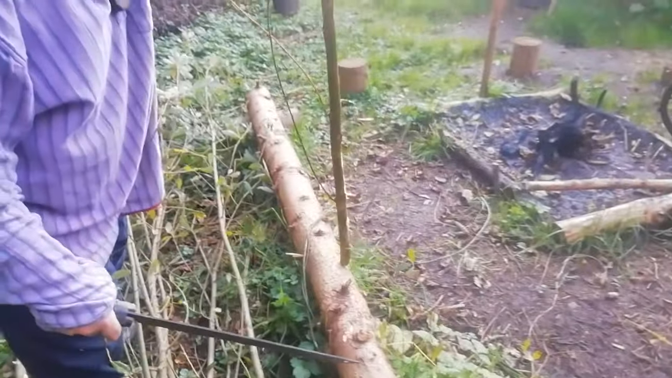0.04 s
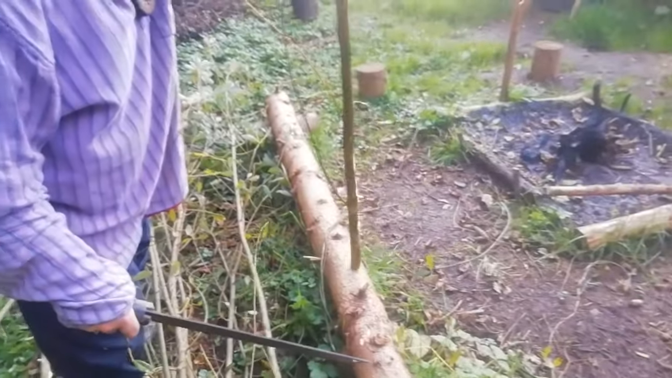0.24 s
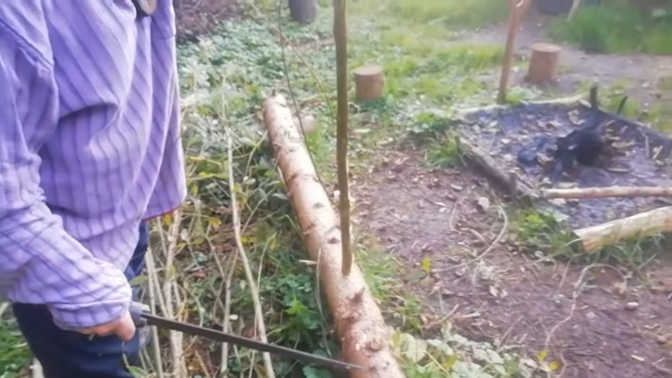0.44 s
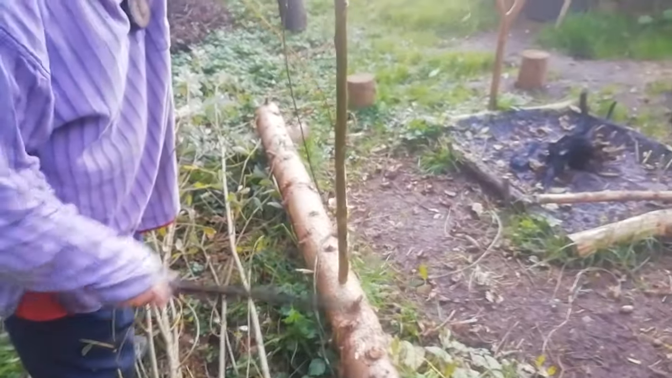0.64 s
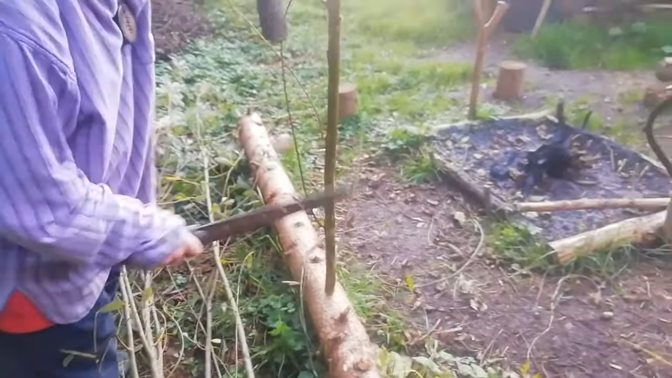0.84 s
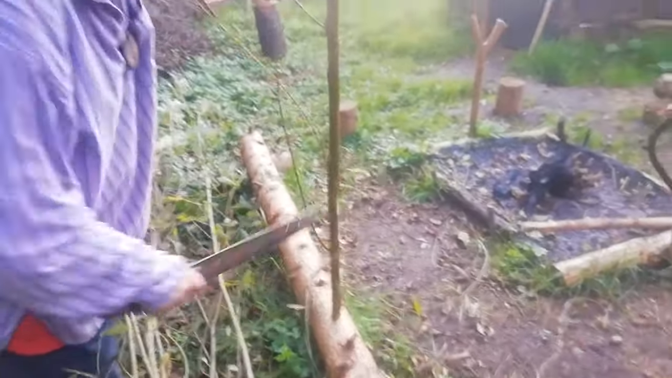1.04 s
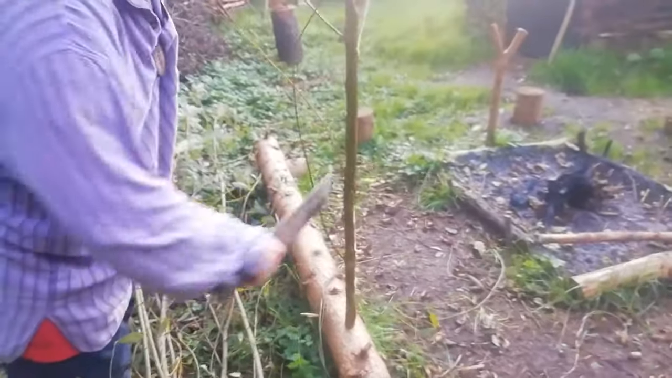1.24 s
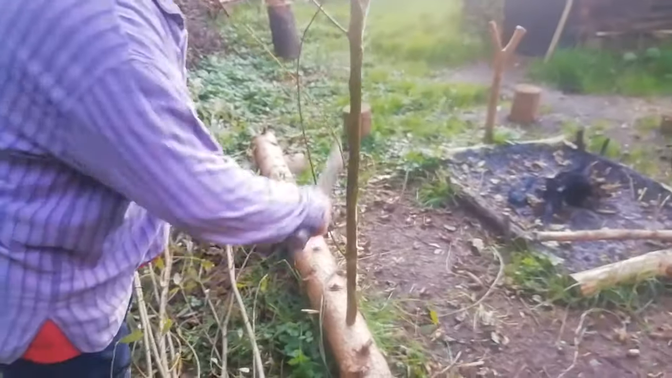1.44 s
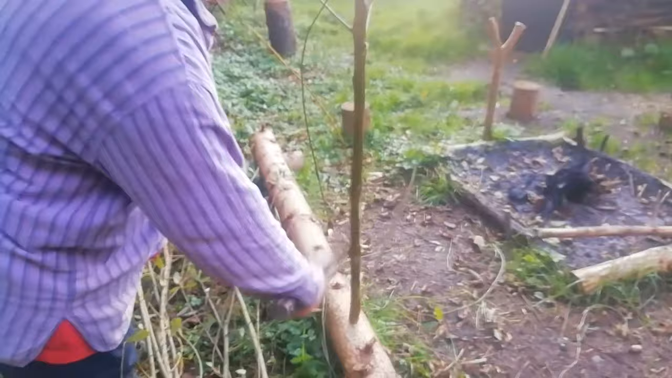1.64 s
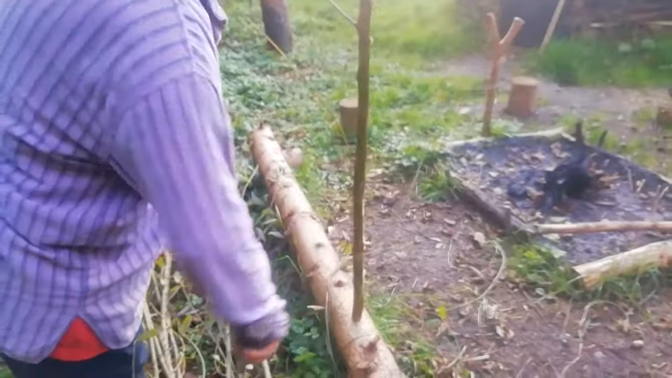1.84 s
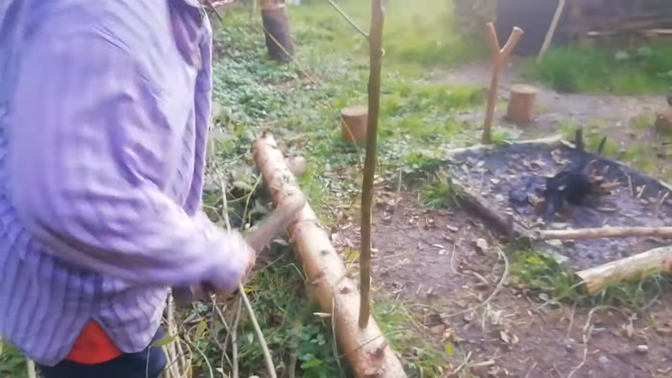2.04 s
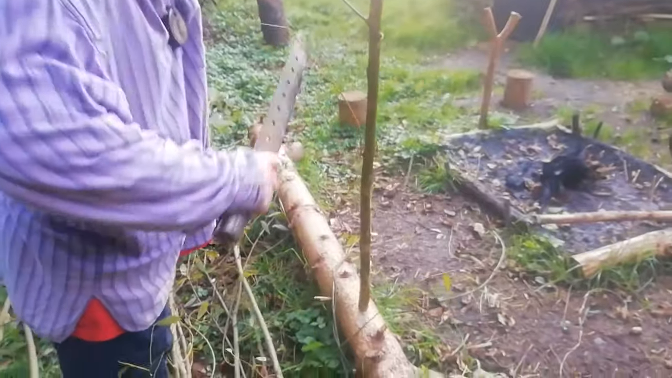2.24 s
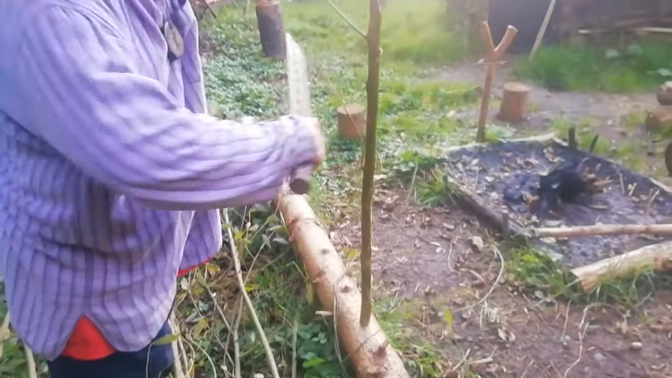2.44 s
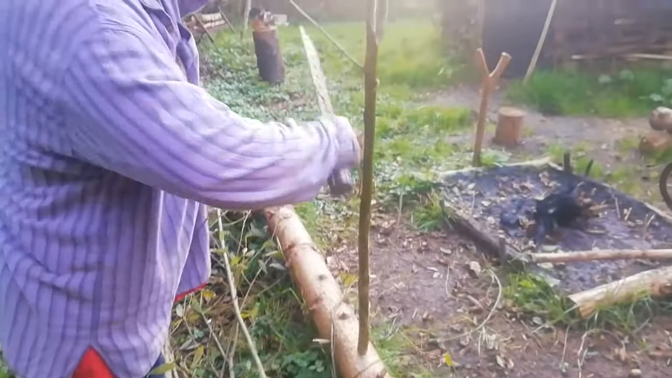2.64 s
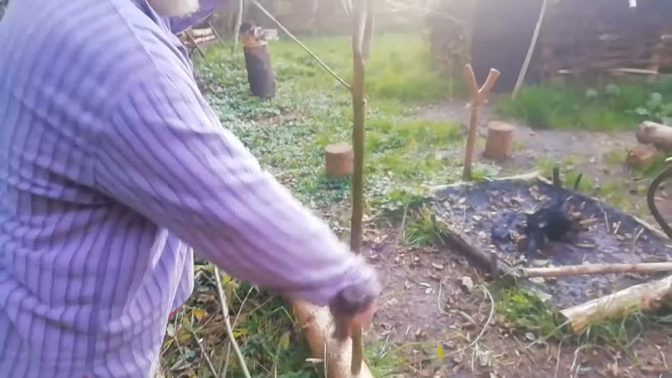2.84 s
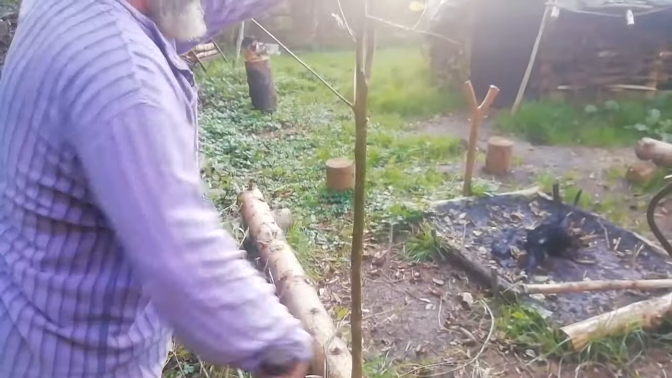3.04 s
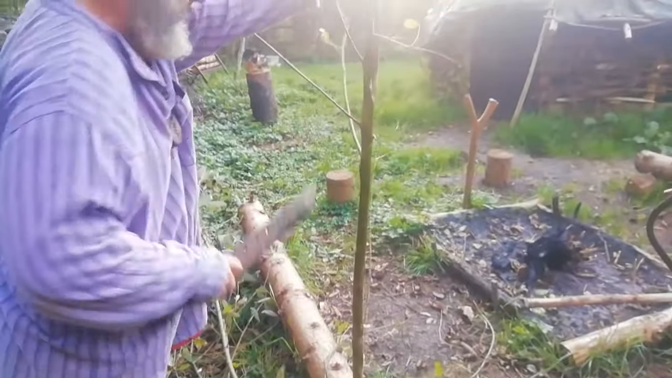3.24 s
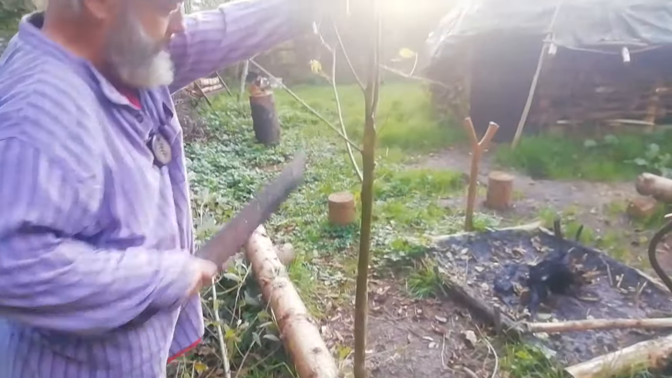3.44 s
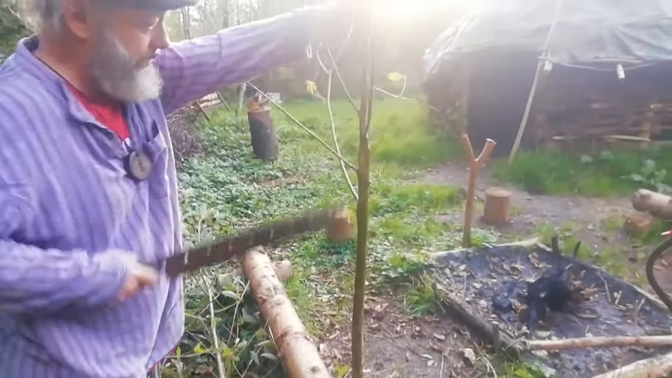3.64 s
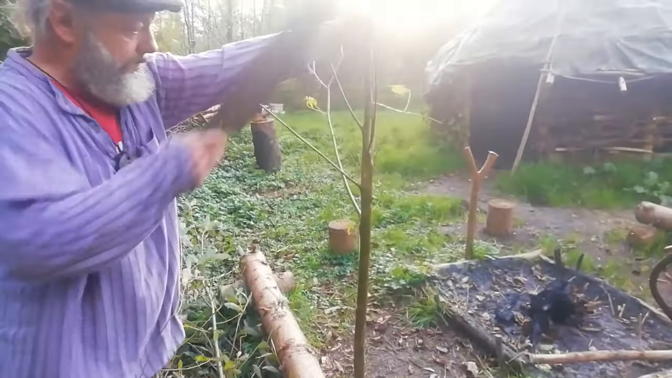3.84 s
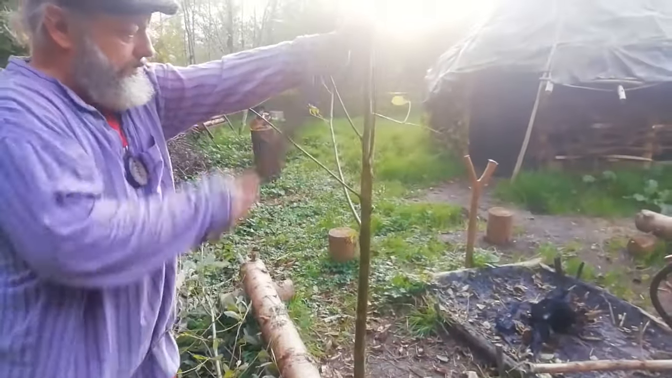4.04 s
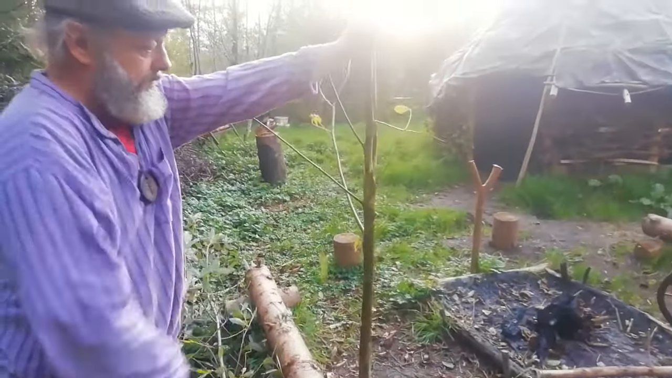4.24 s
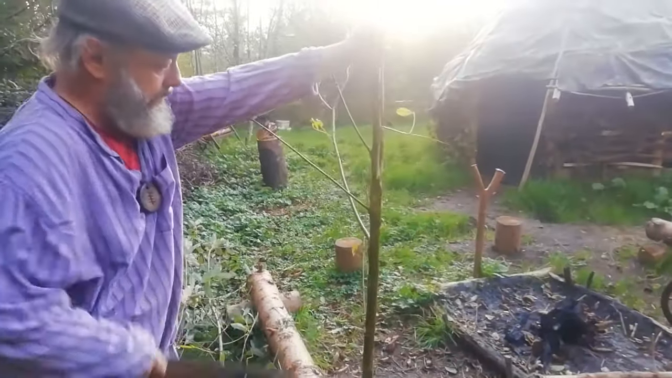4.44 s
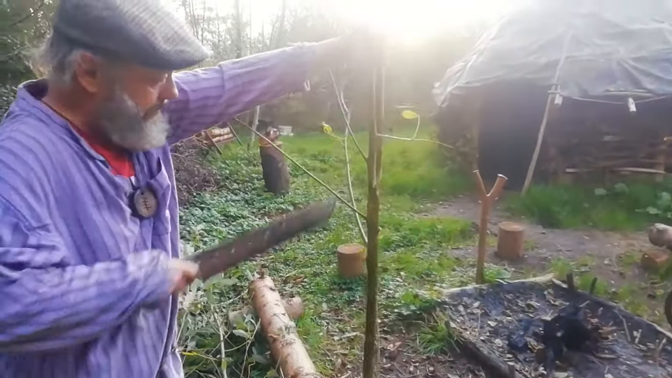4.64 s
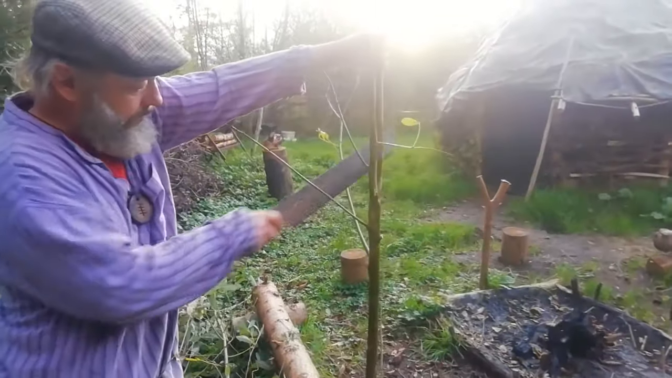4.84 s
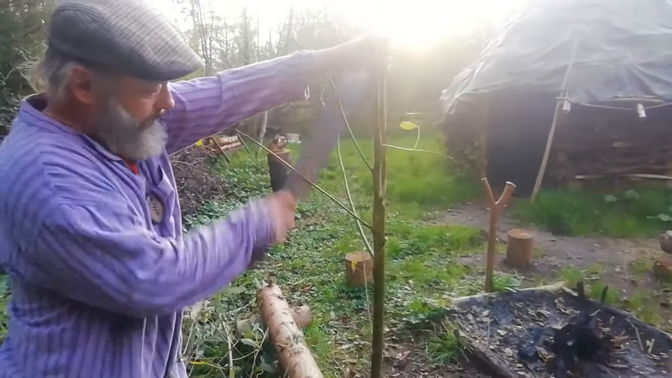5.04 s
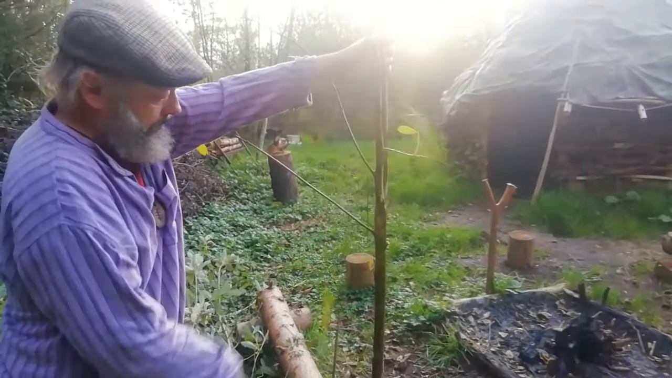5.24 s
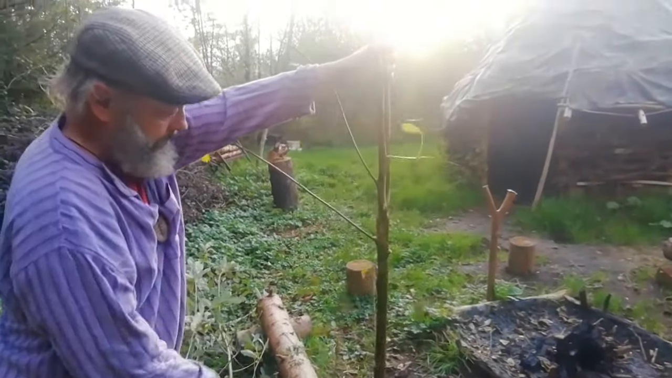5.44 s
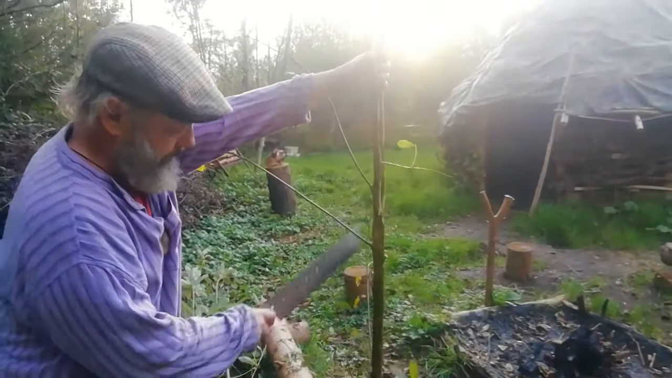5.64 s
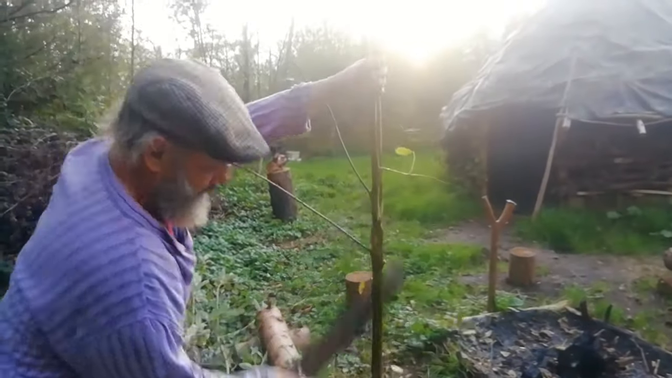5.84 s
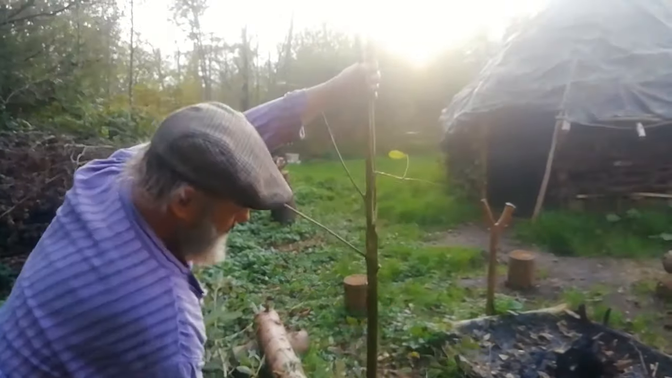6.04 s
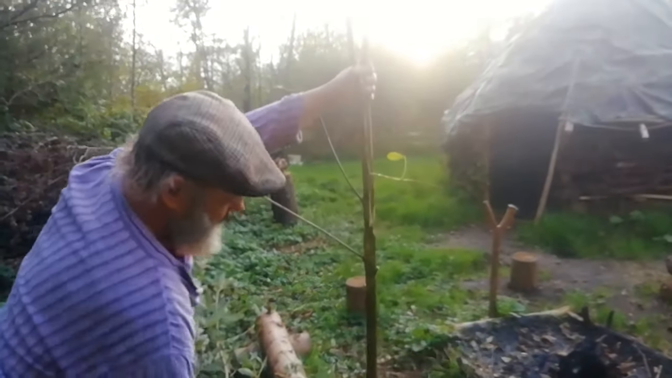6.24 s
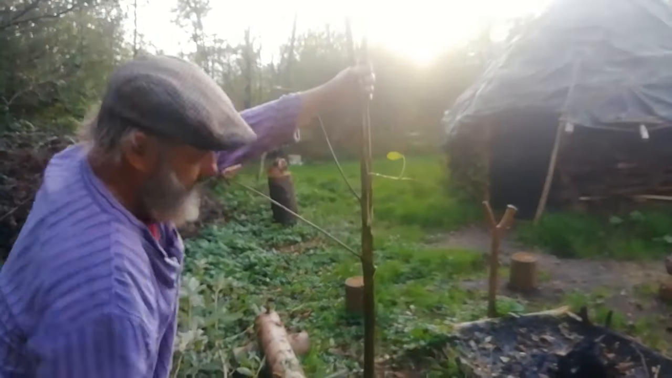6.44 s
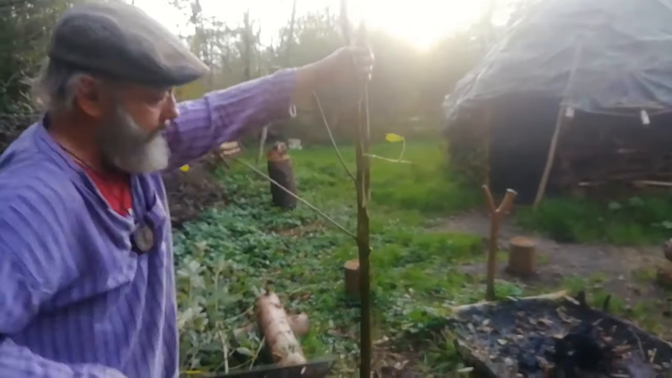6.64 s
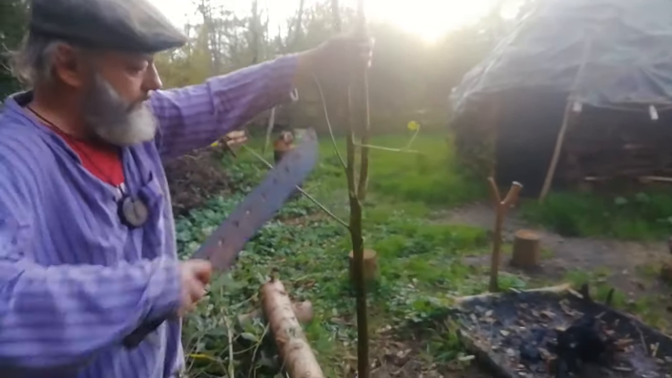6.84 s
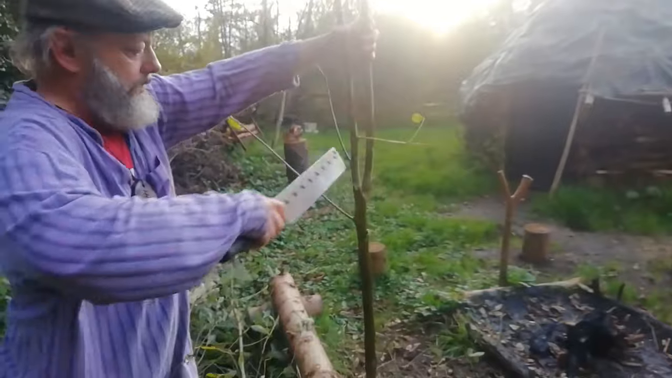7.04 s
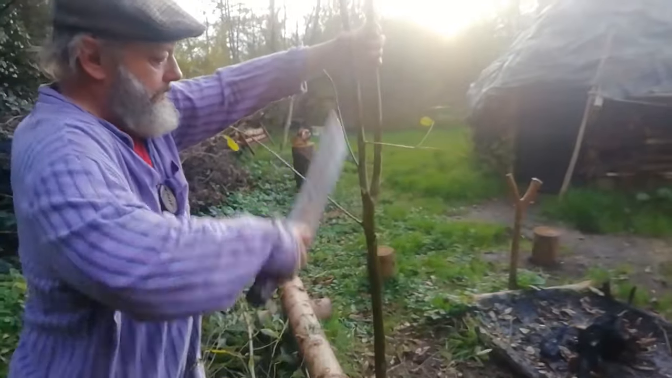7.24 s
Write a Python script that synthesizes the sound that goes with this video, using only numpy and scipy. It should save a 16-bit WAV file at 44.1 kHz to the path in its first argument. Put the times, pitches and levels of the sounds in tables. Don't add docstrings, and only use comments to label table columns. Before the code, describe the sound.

Close, dry, bright stereo sound outdoors: stems settle faintly, then six strokes of a steel blade split thin fresh wood. Some cuts crackle twice; one lands with a heavier hollow thud. Leafy twigs drop and brush against the undergrowth between strokes, and an arm swishes through leaves. Far behind, a crow calls four times early on, a tiny bird chirps, and the air stays quiet. The phone microphone's limiting briefly ducks everything under the cuts.

```python
import sys
import numpy as np
from scipy import signal
from scipy.io import wavfile
from scipy.ndimage import uniform_filter1d

SR = 44100
rng = np.random.default_rng(int(sys.argv[2]) if len(sys.argv) > 2 else 0)


def materialize(psi):
    bounded = np.clip(np.atleast_2d(psi).T, -1, 1)
    quanta = np.round(bounded * 32767).astype(np.int16)
    wavfile.write(sys.argv[1], SR, quanta)


def decibels_to_gain(level_db):
    exponent = np.asarray(level_db, float) / 20
    return 10 ** exponent


N = 322142

# start_s, peak_db, left_right_db, t60_ms, brightest_hz
CUTS = [(1.6692, -24.5, -1, 24, 6544), (1.6741, 1.5, -5, 27, 7805), (1.6797, -14.5, 3.5, 15, 9396),
        (2.7833, -24, -8, 46, 7190), (2.79, -17.5, -7, 45, 6960), (2.7948, -11, -2.5, 43, 5800),
        (2.8023, -19, -13, 24, 5860), (4.082, -4, -2, 16, 4870), (4.0878, -10, -1.5, 25, 8012),
        (4.147, -17.5, 1, 39, 8830), (5.1607, -8.5, -6, 27, 7870), (5.164, -2, -3.5, 34, 7900),
        (5.168, -11, -13.5, 28, 7840), (5.2085, 0, -3.5, 20, 8280), (5.9307, -22, -8.5, 37, 7520),
        (5.9398, -16.5, 4, 35, 5092), (5.9453, -8, -9, 44, 6730), (5.9587, -10.5, -4.5, 60, 7000),
        (5.9828, -2, -4.5, 26, 6300), (5.9865, -2.5, 8, 30, 9050), (5.9949, -17, -12.5, 26, 7670),
        (7.29, -32.5, 2, 60.4, 7000), (7.2934, -13, 6.5, 23.5, 8970), (7.2973, -2, 2, 45, 8880)]
# start_s, peak_db, left_right_db, woody_rel_db
TWIGS = [(1.802, -24.5, -1.5, -14), (2.889, -33, -5.5, -8), (2.8992, -29, -10.5, -14.5),
         (2.908, -22, -7.5, -15.5), (2.9239, -35, -4, -19), (2.9653, -42.5, -1, -14), (2.974, -36, -1, -23),
         (3.035, -34.5, -0.5, -12), (4.1313, -22.5, -7.5, -14), (4.177, -34.5, -6, -10),
         (4.2936, -27, -1, -33), (4.307, -41, -15, -10), (4.3975, -34, 4.5, -16), (4.4805, -36, -2.5, -15),
         (4.518, -37, -7, -6.5), (5.3044, -24, -5.5, -8.5), (5.338, -24, -7.5, -24),
         (5.3676, -18.5, -3.5, -30), (5.372, -18, -8, -19), (5.5553, -34.5, -6.5, -24),
         (5.5728, -29, -7.5, -20), (5.788, -34, 1.5, -36), (6.169, -32.5, -11.5, -10)]
# start_s, peak_db
TICKS = [(0.944, -41.5), (1.304, -40), (1.936, -38.5), (2.173, -45), (2.3392, -42), (2.9915, -44),
         (3.275, -50), (3.0591, -41.5), (3.09, -41.5), (3.1269, -41), (3.2053, -41.5), (3.257, -46),
         (4.4075, -48), (4.453, -40), (4.592, -36.5), (6.317, -43), (7.119, -53.5)]
# freq_hz, density_db
SNAP_SPECTRUM = [(1760, -27), (3000, -16), (4190, -14.5), (5020, -6.5), (5970, -6), (7890, -3),
                 (9450, -8.5), (10000, -8.5), (11900, -15), (14000, -17), (15800, -30)]
# freq_hz, density_db
WOODY_SPECTRUM = [(88, -48.5), (150, -6), (553, -2), (1900, 3.5), (2440, 5), (3490, -28), (4000, -15),
                  (5200, -38.5), (8800, -120)]
CUT_WOODY_DB, GRAZE_WOODY_DB, GRAZE_S = -20.5, -12, 7.2
TWIG_T60_MS, TICK_T60_MS, TICK_PAN_DB, TICK_WOODY_DB = 36, 29, -4, -18
BITE_DB, BITE_WIDTH_HZ = -1.0, 190

# start_s, peak_db, left_right_db, pitch_hz
CRACKS = [(1.9132, -38.5, -9, 7320), (1.9349, -40.5, -14, 6700), (2.789, -10, -10.5, 6400),
          (2.7969, -6.5, -15.5, 6140), (2.9008, -25, 1, 8960), (2.9116, -16.5, -14, 7400),
          (2.9276, -28, -4.5, 7300), (2.9726, -32.5, -13, 5900), (2.9807, -43, 4.5, 8140),
          (3.0045, -38, -18, 7490), (3.034, -35, -10.5, 6800), (3.0603, -38.5, -2, 7490),
          (3.4633, -45.5, -6, 5490), (3.645, -39, -2, 6410), (3.7132, -34, 0, 7820),
          (3.8696, -42.5, -0.5, 8540), (3.955, -40, -2, 6940), (4.2946, -22, 2, 9200),
          (4.3071, -36.5, -15, 5130), (4.3983, -28, 20, 8600), (4.405, -36, 10.5, 7960),
          (4.4535, -36, 18, 8700), (5.1626, -1, -4, 7700), (5.168, -2, -4.5, 8060),
          (5.304, -24, -5.5, 6600), (5.31, -22.5, -8.5, 8000), (5.3668, -14.5, -7, 6350),
          (5.3726, -13.5, -13.5, 6100), (5.4337, -26, -7.5, 6860), (5.5576, -30.5, -12, 6370),
          (5.5738, -23, -13.5, 5940), (5.7879, -26, -6.5, 5600), (5.9322, -16.5, -9.5, 6950),
          (5.9853, 0.5, -8, 6270), (6.1281, -40, 12.5, 8340), (6.3238, -38.5, 4, 6196),
          (7.119, -41.5, 18, 8424), (7.2932, -13.5, 1, 8230), (7.2975, -3.5, 1.5, 8800),
          (1.6755, -2.5, -2, 7500), (5.2089, -6.5, -3.5, 7000), (0.6496, -55.5, 6, 8200),
          (1.387, -47, -0.5, 6500)]
CRACK_CYCLES = 1.8

# start_s, peak_db, pitch_hz, t60_ms
THUNKS = [(1.6692, -12.5, 1400, 36), (2.7883, -22, 1690, 59), (2.793, -23.5, 2160, 75),
          (4.0813, -19, 2640, 40), (5.1609, -5.5, 2130, 27), (5.165, -14, 1200, 30), (5.192, -34, 1920, 15),
          (5.2077, -18, 2230, 28), (5.3272, -30.5, 2450, 34), (5.333, -33.5, 1100, 21),
          (5.342, -33, 1490, 31), (5.358, -36.5, 3000, 20), (5.3525, -34, 2170, 37),
          (5.3748, -34, 1101, 22), (5.386, -33.5, 2600, 20), (6.166, -37.5, 1280, 49.3),
          (5.3802, -29.5, 1710, 33), (5.7865, -29.5, 2525, 16.8), (5.9308, -24.5, 2590, 27.8),
          (5.9427, -28.5, 1290, 89), (5.9578, -27, 1550, 64), (5.9821, -18, 3130, 61),
          (4.082, -22, 13980, 25), (4.1476, -27, 13570, 50), (2.795, -26.5, 13500, 30)]
THUNK_RISE_S, THUNK_WIDTH = 0.0011, 0.78
# start_s, peak_db, pitch_hz
BUMPS = [(.138, -42, 1560), (.543, -43.5, 1290), (.567, -43, 1940), (.597, -45, 1770), (.628, -49, 1870),
         (.645, -50, 1600), (1.384, -52, 1800), (1.975, -39, 1570), (2.029, -38, 1480), (2.051, -36, 1600),
         (2.093, -40, 1500), (2.123, -39, 1510), (2.185, -44, 1580), (3.504, -44.5, 1354),
         (5.572, -44, 1410), (5.577, -39.5, 2450), (5.586, -44, 2150), (5.6, -56, 2220),
         (4.519, -44.5, 1850)]
BUMP_T60_MS, BUMP_RISE_S, BUMP_WIDTH = 57.6, 0.0045, 0.36

# start_s, level_db, pitch_hz, t60_ms, left_right_db
NOTES = [(1.6704, -15, 1502, 12, -1.5), (1.6745, -11.5, 5150, 27, -3.5), (1.6754, -7, 9230, 25, 7),
         (1.802, -36, 4980, 70, 0), (2.791, -22.5, 270, 56, -2), (2.812, -40.5, 165.6, 130, 1),
         (2.7955, -10, 5888, 14, -6), (2.887, -51, 225, 110, 0), (2.909, -52, 570, 83, -8),
         (4.082, -14.5, 5000, 27, -3), (4.083, -10.5, 6790, 25, 0), (4.089, -20.5, 4670, 48, -4),
         (5.1615, -13.5, 1922, 22, -6.5), (5.1621, -12.5, 2343, 26, -1.5), (5.1608, -21, 1345, 30, -3),
         (5.165, -13, 8030, 70, 4), (5.208, -9.5, 6725, 13, -5), (5.209, -28, 245, 70, 1),
         (5.993, -18.5, 268, 60, 1.5), (5.999, -37, 807, 140, -6), (6.168, -36.5, 1243, 74, -1),
         (6.169, -38.5, 1420, 66, -4), (6.169, -49, 789, 140, -7), (7.2975, -8, 8854, 50, 4.5),
         (7.2985, -12, 7616, 40, 2), (7.297, -28, 2504, 25, 0)]
NOTE_RISE_CYCLES, NOTE_LAG_S = 0.84, 0.00005

# start_s, level_db, damping_factor, left_right_db, tip_rel_db
RINGS = [
    (1.677, -30.5, .6, 6, -20),
    (2.795, -46, 1.2, 10, 13),
    (2.91, -41.5, .76, 9, -12),
    (4.082, -27, .8, 0, -2),
    (4.148, -39, .45, 3.5, -9),
    (5.164, -35, .8, -1.5, -13),
    (5.209, -27.5, .91, 0, -10),
    (5.947, -35, .41, 0.5, -6.5),
    (5.984, -38.5, .31, 0, -7.5),
    (7.297, -27.5, .8, 21, -16),
]
# pitch_hz, level_db, t60_s
BLADE_MODES = [(5200, -7, .05), (5630, -11, .07), (6228, -4, .09), (6850, 1, .08), (7500, 0, .12),
               (7970, -8, .14), (8140, 2, .13), (8520, -7, .1), (8830, 2, .09), (9200, -4, .07)]
# pitch_hz, level_db, t60_s
TIP_MODES = [(10770, 0.5, 0.1), (10570, -4, .08), (11770, -8, .1), (12560, -8, .06)]
# pitch_hz, t60_s
LONG_MODES = [(4728, .58), (4743, .55), (4785, .26), (4880, .07)]
# start_s, first_db, second_db, third_db, left_right_db
LONG_RINGS = [
    (1.677, -45, -42, -43, -7),
    (2.794, -50, -62, -47, -3),
    (2.912, -62, -53.5, -60, -3),
    (4.083, -47, -40.5, -36, -2),
    (5.162, -49.5, -54, -49.5, -5.5),
    (5.212, -50, -46.5, -46, -8),
]
SWING_DB, SWING_HZ = 1.6, 40

# start_s, level_db, thud_rel_db, overtones_rel_db, upper_rel_db
KNOCKS = [
    (1.675, -40, 5.5, -3, 1.5),
    (1.831, -54.5, -22, -18, 5),
    (2.797, -34, -2, -8.5, -16),
    (4.083, -40, -0.5, -10.5, 3),
    (4.295, -47, -7, -2, 0),
    (5.165, -32.5, 3.5, -7.5, 2),
    (5.21, -37, 3, -11.5, -6),
    (5.949, -40, 5, -7.5, 6),
    (5.995, -16.5, -7, -15.5, -8),
    (6.172, -61, 2, 6, 18),
]
# pitch_hz, level_db, t60_s
ROD_LOW_MODES = [(177, -6.5, 0.083), (227, -3, 0.071), (265, 3, 0.045), (321.8, -7.5, 0.067),
                 (530, -10, 0.015), (695, 1.5, 0.023)]
# pitch_hz, level_db, t60_s
ROD_MODES = [(404, 0, .1), (381, -6, .06), (440, -7, .05)]
# pitch_hz, level_db, t60_s
ROD_OVER_MODES = [(592, 0, .14), (566, -7, .09), (807, -9, .09), (900, -7, .06)]
# pitch_hz, level_db, t60_s
ROD_HIGH_MODES = [(1013, -4, 0.069), (1238, 1, 0.037), (1374, 5, 0.026)]

# (rise, fall span 20 dB)
SWEEPS = [(0.129, -75, 0.069, .07, 9.5), (.33, -61.5, 0.54, 0.38, -4.5), (.47, -56.5, 0.18, 0.32, -8),
          (0.564, -50.5, 0.196, 0.061, -9.5), (.62, -68.5, .15, 0.22, 1.5), (.97, -66.5, 0.59, 0.155, -6),
          (1.42, -67, .4, 0.27, -6), (3.33, -62, 0.95, 0.31, -8), (3.521, -55, 0.14, 0.66, -5),
          (3.648, -50.5, 0.018, 0.22, -21), (3.73, -45.5, .12, 0.12, -15.5), (3.765, -46, 0.16, 0.1, -3.5),
          (3.87, -54.5, 0.2, 0.17, -6), (4.3, -61.5, 0.79, .3, -9), (4.982, -61, 0.116, 0.27, -11),
          (5.3, -57, 0.25, 0.098, -11), (6.6, -67, .9, 1.78, -16.5)]
# (rise, fall span 20 dB)
SHAKES = [(1.81, -40.5, 0.018, 0.067), (1.86, -57, 0.074, 0.43), (2.93, -47.5, 0.13, 0.083),
          (4.389, -46, 0.022, 0.023), (4.52, -51.5, 0.19, 0.21), (4.77, -58.5, 0.1, 0.142),
          (5.338, -36.5, 0.016, 0.085), (5.385, -43, 0.03, .03), (5.434, -47, 0.069, 0.12),
          (5.56, -47, 0.0054, 0.077), (5.577, -47, .01, 0.079), (5.607, -49, 0.079, 0.015),
          (5.78, -60, 0.16, 0.14), (6.11, -49, 0.21, 0.059), (6.18, -41, 0.077, 0.065),
          (6.31, -58.5, 0.367, 0.13)]
# freq_hz, density_db
LEAVES_SPECTRUM = [(1470, -48), (2500, -12), (3280, -11), (4100, -11.5), (4780, -4), (7310, -4.5),
                   (8020, -4), (9070, -6), (12500, -19.5), (15800, -23.5)]
# freq_hz, density_db
SHEEN_SPECTRUM = [(2500, -45.5), (5500, -17.5), (7000, -6), (8300, -2.5), (9400, -6), (11000, -26),
                  (15800, -39.5)]
# freq_hz, density_db
SWISH_SPECTRUM = [(500, -21.5), (1000, -4), (1400, 0.5), (2100, -5.5), (2800, -7), (4000, -6.5),
                  (6000, -23)]
SHAKE_SWISH_DB, STIR_DB, STIR_SWISH_DB = -13.5, -74, -6
SHEEN_DB, SHEEN_LAW, BROAD_LAW, LAW_PIVOT_DB = -1.5, 0.98, 1.066, -51.5
RUSTLE_PAN_DB, PAN_DRIFT_DB_PER_S = -1.5, 0.35

# freq_hz, t60_s
TREES = [(300, 0.16), (2000, 0.19), (8000, 0.19), (15000, 0.26)]

# start_s, level_db, length_s
CAWS = [
    (0.923, -56.5, 0.53),
    (1.739, -56, 0.5),
    (2.578, -58.5, .56),
    (3.495, -60, 0.75),
]
THROAT_HZ = 1420
CAW_RISE_S, CAW_RISE_DB, CAW_HOLD, CAW_SAG_DB, CAW_END_DB = 0.06, -6, 0.55, -4.5, -13

# start_s, length_s, first_hz, last_hz, level_db
CHIRPS = [
    (0.423, 0.04, 2280, 1970, -74),
    (0.993, 0.031, 2135, 1940, -70),
    (5.521, 0.047, 2760, 1740, -75.5),
    (6.325, 0.051, 2275, 1760, -74),
    (6.38, 0.015, 1770, 2203, -82),
]
CHIRP_BEND = 1.4

HUM_HZ, HUM_DB, DRONE_HZ = 64.99, -51, 156.3
# time_s, level_db
DRONE = [(0, -67.5), (3.2, -77.5), (4.8, -78.5), (5.4, -63), (7.3, -66)]

# freq_hz, density_db
AIR_SPECTRUM = [(11, -42), (18, -12), (42, -9.5), (70, -8), (93, -18), (114, -24), (160, -19), (201, -22.5),
                (624, -28.5), (1780, -30.5), (2800, -39), (6200, -41), (8480, -43), (10900, -55.5),
                (15800, -57.5)]
# freq_hz, correlation
AIR_LIKENESS = [(60, 0.97), (130, .92), (290, 0.39), (640, -0.37), (1400, 0.18), (15000, -1.1)]
AIR_DB, HISS_DB = -60.5, -74.5


def evened(x):
    return x / np.sqrt(np.mean(x ** 2) + 1e-20)


def read(points, hz):
    f, value = np.transpose(points)
    return np.interp(np.log(hz + 1), np.log(f + 1), value)


def add(mix, s, sound):
    part = mix[..., round(s * SR):][..., :sound.shape[-1]]
    part += sound[..., :part.shape[-1]]


def panned(x, pan_db):
    return x * decibels_to_gain(np.array([[.5], [-.5]]) * pan_db)


def colour(x, points):
    log_gain = np.log(decibels_to_gain(read(points, abs(np.fft.fftfreq(4096, 1 / SR)))))
    taps = np.fft.ifft(np.exp(log_gain - 1j * signal.hilbert(log_gain).imag)).real[:2048]
    return signal.oaconvolve(x, taps[None] / np.linalg.norm(taps), axes=1)[:, :N]


def wander(top_hz):
    t = np.arange(0, N + 64, 64) / SR
    slow = 0
    for f in np.geomspace(0.031 * top_hz, top_hz, 20):
        slow = slow + np.sin(2 * np.pi * (f * t + rng.random())) / np.sqrt(f)
    return np.interp(np.arange(N) / SR, t, evened(slow))


def resonate(x, hz, width_hz):
    turn = np.exp(2j * np.pi * np.cumsum(hz) / SR)
    r = np.exp(-np.pi * width_hz / SR)
    return 2 * (turn * signal.lfilter([1 - r], [1, -r], x / turn)).real


def ring(modes, damp=1.0, rise_s=0.0018, scatter=1):
    hz, db, t60 = np.transpose(modes)[..., None]
    t = np.arange(0, t60.max() * damp, 1 / SR)
    start, shift, tilt = rng.random((3, len(modes), 1))
    right = np.array([0, 1])[:, None, None]
    phase = scatter * (start + right * (0.19 + hz / 14000) * shift)
    level = decibels_to_gain(db - 1.4 * right * (tilt - 3.0) - 60 * t / (t60 * damp))
    sines = level * np.sin(2 * np.pi * (hz * t + phase))
    return sines.sum(1) * (1 - np.exp(-t / rise_s))


def crackle(uneven_db, same, patchy_db):
    size = decibels_to_gain(uneven_db * np.minimum(rng.exponential(1, N // 16 + 1), 4))
    size = size.repeat(16)[:N]
    a, b = rng.standard_normal((2, N)) * evened(size)
    right = same * np.roll(a, 1) + np.sqrt(1 - same ** 2) * b
    z = signal.stft(np.array([a, right]), nperseg=256)[2]
    patches = uniform_filter1d(rng.standard_normal(z.shape[1:]), size=9, axis=0)
    patches = uniform_filter1d(patches, size=5, axis=1)
    return evened(signal.istft(z * decibels_to_gain(patchy_db * evened(patches)), nperseg=256)[1][:, :N])


def bursts(rows, rise_s):
    bright, woody = np.zeros((2, N)), np.zeros((2, N))
    t = np.arange(SR // 10) / SR
    for s, db, pan_db, woody_db, t60_ms in rows:
        shape = decibels_to_gain(db - 6.0 - 60 * t / (t60_ms / 1000)) * (1 - np.exp(-t / rise_s))
        add(bright, s, panned(shape, pan_db))
        add(woody, s, panned(shape * decibels_to_gain(woody_db), pan_db))
    return bright, woody


def bite(x):
    out = 0
    for hz, db, _ in BLADE_MODES:
        b, a = signal.iirpeak(hz, hz / BITE_WIDTH_HZ, fs=SR)
        out = out + decibels_to_gain(db) * signal.lfilter(b, a, x)
    return out


def snaps():
    cut_rows = []
    for s, db, pan_db, t60_ms, _ in CUTS:
        cut_rows.append((s, db, pan_db, CUT_WOODY_DB + GRAZE_WOODY_DB * (s > GRAZE_S), t60_ms))
    small_rows = [(*row, TWIG_T60_MS) for row in TWIGS]
    small_rows += [(s, db, TICK_PAN_DB, TICK_WOODY_DB, TICK_T60_MS) for s, db in TICKS]
    cut, cut_woody = bursts(cut_rows, 0.0005)
    twig, twig_woody = bursts(small_rows, 0.00025)
    bright = crackle(2.7, 0.14, patchy_db=3.5)
    woody = crackle(3.7, 0.65, patchy_db=5.0)
    split = cut * bright
    s, piece_hz = np.transpose(CUTS)[[0, -1]]
    latest = np.maximum(np.searchsorted(s, np.arange(N) / SR) - 1, 0)
    piece_hz = piece_hz[latest]
    piece = decibels_to_gain(2.0) * resonate(split, piece_hz, 650) + decibels_to_gain(-3.5) * resonate(split, piece_hz, 2600)
    bright_mix = decibels_to_gain(-8.5) * split + decibels_to_gain(BITE_DB) * bite(split) + piece + twig * bright
    return colour(bright_mix, SNAP_SPECTRUM) + colour((cut_woody + twig_woody) * woody, WOODY_SPECTRUM)


def cracks():
    out, t = np.zeros((2, N)), np.arange(200) / SR
    for s, db, pan_db, hz in CRACKS:
        shape = np.exp(-t * hz / CRACK_CYCLES) * (1 - np.exp(-t * hz))
        add(out, s, panned(decibels_to_gain(db + 6.5) * shape * np.sin(2 * np.pi * hz * t), pan_db))
    return signal.sosfilt(signal.butter(2, 2500, "highpass", fs=SR, output="sos"), out)


def thunks():
    out, t = np.zeros((2, N)), np.arange(SR // 10) / SR
    hard = [(*row, THUNK_RISE_S, THUNK_WIDTH) for row in THUNKS]
    soft = [(*row, BUMP_T60_MS, BUMP_RISE_S, BUMP_WIDTH) for row in BUMPS]
    for s, db, pitch_hz, t60_ms, rise_s, share in hard + soft:
        a, b = rng.standard_normal((2, len(t)))
        puff = np.array([a, 0.93 * np.roll(a, 1) + .5 * b])
        hz, width_hz = np.full(len(t), pitch_hz), share * pitch_hz
        note = evened(resonate(resonate(puff, hz, width_hz), hz, width_hz))
        shape = decibels_to_gain(db - 3.5 - 60 * t / (t60_ms / 1000)) * (1 - np.exp(-t / rise_s))
        add(out, s, note * shape)
    return panned(out, -2)


def notes():
    out, t = np.zeros((2, N)), np.arange(SR // 5) / SR
    lag_s = np.array([[0], [NOTE_LAG_S]])
    for s, db, hz, t60_ms, pan_db in NOTES:
        shape = decibels_to_gain(db - 60 * t / (t60_ms / 1000)) * (1 - np.exp(-t * hz / NOTE_RISE_CYCLES))
        add(out, s, panned(shape * np.sin(2 * np.pi * hz * (t - lag_s)), pan_db))
    return out


def blade():
    out = np.zeros((2, N))
    for s, db, damp, pan_db, tip_db in RINGS:
        add(out, s, panned(decibels_to_gain(db) * ring(BLADE_MODES, damp, rise_s=0.002), pan_db))
        add(out, s, panned(decibels_to_gain(db + tip_db) * ring(TIP_MODES, damp, rise_s=.003), pan_db))
    return out


def long_ring():
    out = np.zeros((2, N))
    for s, first_db, second_db, third_db, pan_db in LONG_RINGS:
        levels = first_db, second_db, third_db, third_db + 1.5
        modes = [(hz, db, t60) for (hz, t60), db in zip(LONG_MODES, levels)]
        add(out, s, panned(ring(modes, rise_s=.003, scatter=.4), pan_db))
    return out * decibels_to_gain(SWING_DB * np.array([wander(SWING_HZ), wander(SWING_HZ)]))


def rod():
    out = np.zeros((2, N))
    for s, db, low_db, over_db, high_db in KNOCKS:
        add(out, s, decibels_to_gain(db + low_db) * ring(ROD_LOW_MODES, rise_s=0.006))
        add(out, s, decibels_to_gain(db) * ring(ROD_MODES, rise_s=0.006))
        add(out, s, decibels_to_gain(db + over_db) * ring(ROD_OVER_MODES, rise_s=0.0016))
        add(out, s, decibels_to_gain(db + high_db) * ring(ROD_HIGH_MODES))
    return panned(out, -0.59)


def gusts(rows, t):
    s, db, rise_s, fall_s = np.transpose(rows)[:4, :, None]
    distance = np.where(t < s, (s - t) / rise_s, (t - s) / fall_s)
    return decibels_to_gain(db - 20 * distance) ** 2


def rustle():
    t = np.arange(N) / SR
    coarse = t[::32]
    sweeps, shakes = gusts(SWEEPS, coarse), gusts(SHAKES, coarse).sum(0)
    stir = decibels_to_gain(STIR_DB) ** 2
    high_power = sweeps.sum(0) + shakes + stir
    low_power = decibels_to_gain(np.transpose(SWEEPS)[-1]) ** 2 @ sweeps
    low_power = low_power + decibels_to_gain(SHAKE_SWISH_DB) ** 2 * shakes + decibels_to_gain(STIR_SWISH_DB) ** 2 * stir
    high = np.interp(t, coarse, np.sqrt(high_power))
    low = np.interp(t, coarse, np.sqrt(low_power))
    swish = low * decibels_to_gain(0.92 * wander(51)) * colour(crackle(2.3, 0.083, patchy_db=2.5), SWISH_SPECTRUM)
    effort = high / decibels_to_gain(LAW_PIVOT_DB)
    broad = colour(crackle(1.1, 0.054, patchy_db=2.5), LEAVES_SPECTRUM)
    broad = decibels_to_gain(-3.0) * effort ** BROAD_LAW * broad
    sheen = colour(crackle(3.1, 0.07, patchy_db=3.0), SHEEN_SPECTRUM)
    sheen = decibels_to_gain(SHEEN_DB) * effort ** SHEEN_LAW * sheen
    fizz = decibels_to_gain(LAW_PIVOT_DB) * (broad + sheen) + swish
    return panned(fizz * decibels_to_gain(2.5 + 1.2 * wander(90)), RUSTLE_PAN_DB + PAN_DRIFT_DB_PER_S * t)


def trees(x):
    hz, t, z = signal.stft(rng.standard_normal((2, SR // 2)), SR, nperseg=256)
    tail = signal.istft(z * decibels_to_gain(-60 * t / read(TREES, hz)[:, None]), SR, nperseg=256)[1]
    tail = tail * (1 - np.exp(-np.arange(tail.shape[1]) / (0.0024 * SR)))
    return signal.fftconvolve(x, tail / np.linalg.norm(tail[0]), axes=1)[:, :N]


def crow():
    out = np.zeros((2, N))
    for start, db, length in CAWS:
        t = np.arange(0, length, 1 / SR)
        jitter = uniform_filter1d(rng.standard_normal(len(t)), size=200)
        turns = np.cumsum(115 * (1 + 2.0 * jitter)) / SR
        puffs = (1.0 + np.exp(-(turns % 1) / .3)) * rng.standard_normal((2, len(t)))
        hz = THROAT_HZ * (1.06 - 0.12 * t + .04 * wander(14)[:len(t)])
        throat = resonate(resonate(puffs, hz, 330), hz, 330)
        upper = resonate(resonate(puffs, 1.35 * hz, 600), 1.35 * hz, 600)
        voice = evened(throat + decibels_to_gain(-12.0) * upper)
        shape_s = [0, CAW_RISE_S, CAW_HOLD * length, length]
        shape_db = np.interp(t, shape_s, [CAW_RISE_DB, 0, CAW_SAG_DB, CAW_END_DB])
        level = decibels_to_gain(db + shape_db + 1.2 * wander(35)[:len(t)])
        add(out, start, voice * level * signal.windows.tukey(len(t), .1))
    return panned(out, -0.99)


def bird():
    out = np.zeros(N)
    for start, length, first_hz, last_hz, db in CHIRPS:
        left = np.linspace(1, 0, round(length * SR))
        hz = last_hz + (first_hz - last_hz) * left ** CHIRP_BEND
        flutter = evened(uniform_filter1d(rng.standard_normal(len(hz)), size=150))
        whistle = decibels_to_gain(db + 12.0 + 3.2 * flutter) * np.sin(2 * np.pi * np.cumsum(hz) / SR)
        add(out, start, whistle * signal.windows.tukey(len(hz), .5))
    return out


def hum():
    t = np.arange(N) / SR
    low = decibels_to_gain(HUM_DB + 3 + 0.6 * wander(4.4)) * np.sin(2 * np.pi * (HUM_HZ * t + 0.35))
    drone = np.sin(2 * np.pi * np.cumsum(DRONE_HZ + 1.8 * wander(3.6)) / SR)
    drone_db = np.interp(t, *np.transpose(DRONE)) - 5.5 + 3.6 * wander(8)
    return low + decibels_to_gain(drone_db) * drone


def air():
    frames, hz = N // 512 + 5, np.fft.rfftfreq(2048, 1 / SR)
    a, b, c, d, patches = rng.standard_normal((frames, 1025, 5)).T
    patches = uniform_filter1d(patches, size=24, axis=0)
    patches = evened(uniform_filter1d(patches, size=8, axis=1))
    same = np.clip(read(AIR_LIKENESS, hz), -1, 1)[:, None]
    left = a + 1j * b
    right = same * left + np.sqrt(1 - same ** 2) * (c + 1j * d)
    z = np.array([left, right]) * decibels_to_gain(read(AIR_SPECTRUM, hz)[:, None] + 1.4 * patches)
    return decibels_to_gain(AIR_DB) * evened(signal.istft(z, nperseg=2048, noverlap=1536)[1][:, :N])


def scene():
    work = snaps() + cracks() + thunks() + notes() + blade() + rod()
    far = bird()
    echo = trees(decibels_to_gain(-11.5) * work + far)
    return work + long_ring() + far + echo + rustle() + crow() + hum() + air()


def low_pass(x):
    return signal.sosfilt(signal.butter(12, 15970, fs=SR, output="sos"), x)


def record(dry):
    power_db = 10 * np.log10(abs(uniform_filter1d((dry ** 2).mean(0), size=200)) + 1e-12)
    fall_db = np.arange(N) * 140.0 / SR
    held_db = np.maximum.accumulate(power_db + fall_db) - fall_db
    over_db = np.maximum(held_db + 19.0, 0)
    ducked = dry / decibels_to_gain(.33 * uniform_filter1d(over_db, size=400, origin=-150))
    hiss = decibels_to_gain(HISS_DB) * rng.standard_normal(dry.shape)
    edge = signal.firwin(255, 16300, window=("kaiser", 8), fs=SR)[None]
    mix = signal.oaconvolve(np.clip(ducked + hiss, -1, 1), edge, "same")
    return low_pass(mix)


dry = scene()
out = record(dry)
materialize(out)
```